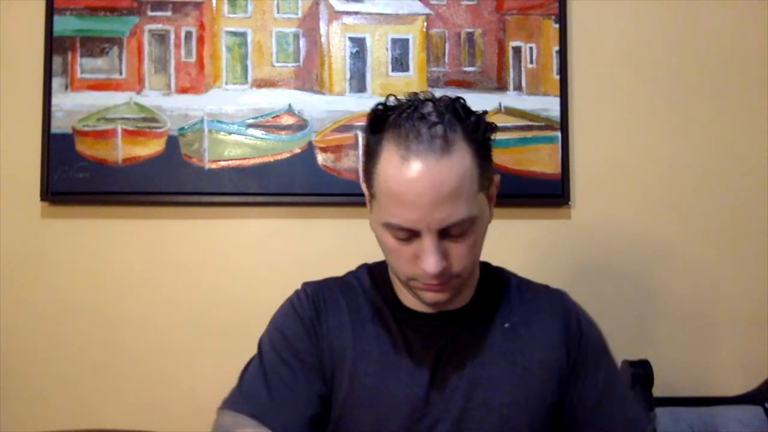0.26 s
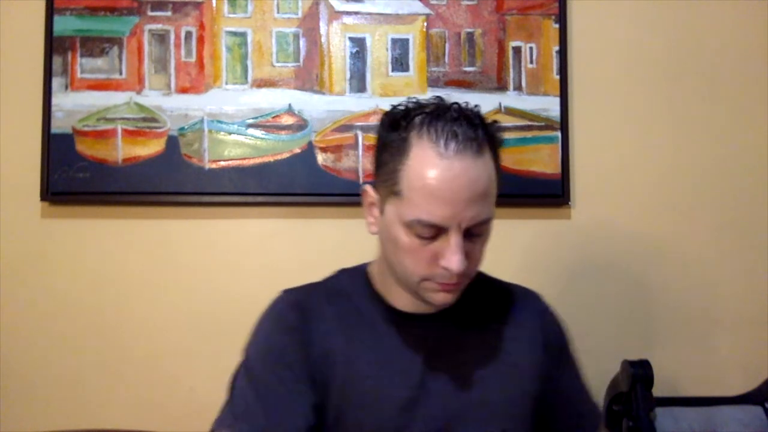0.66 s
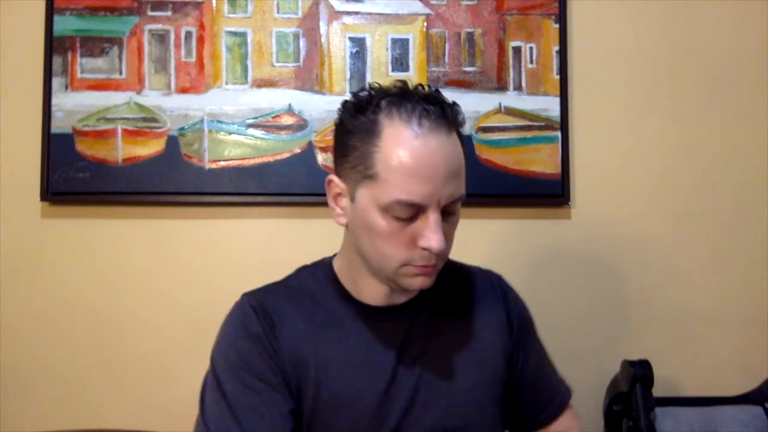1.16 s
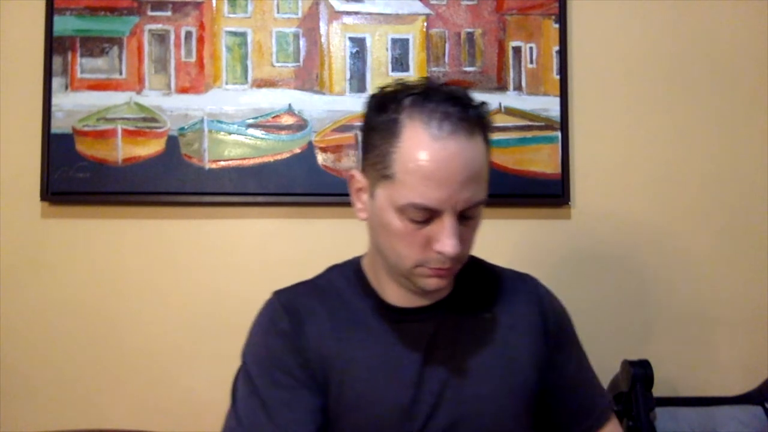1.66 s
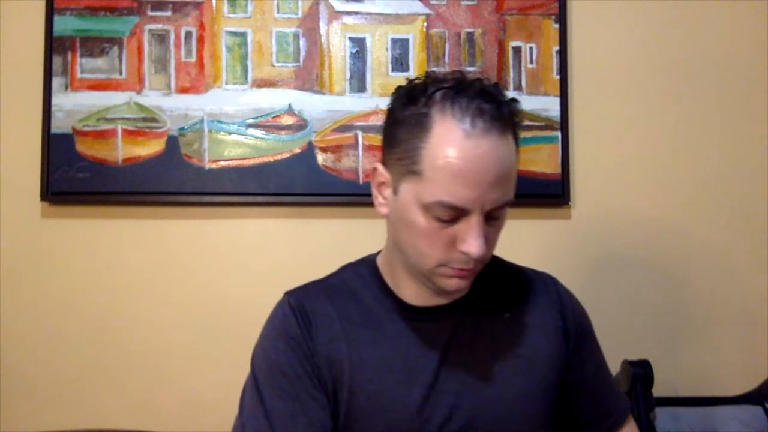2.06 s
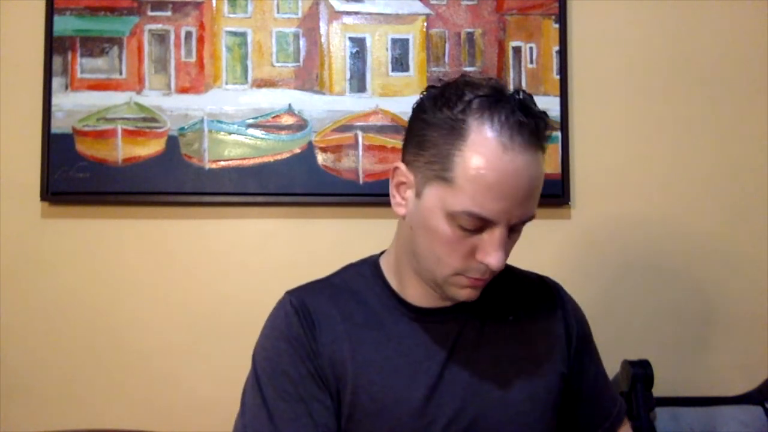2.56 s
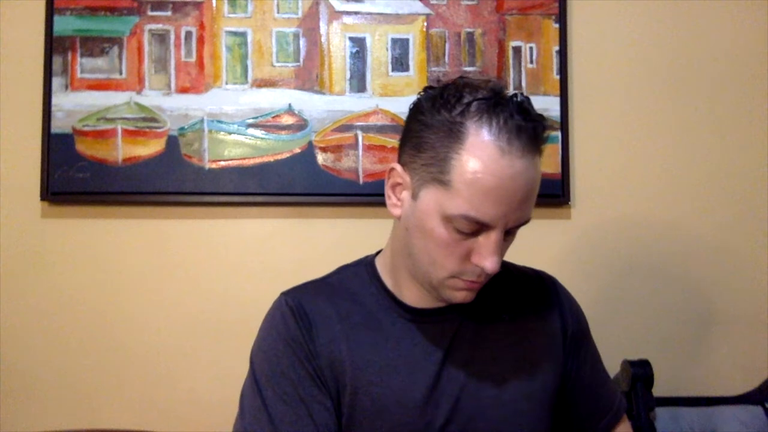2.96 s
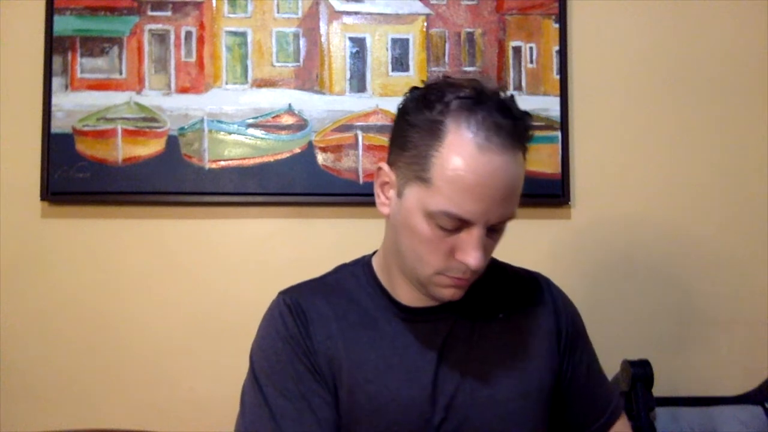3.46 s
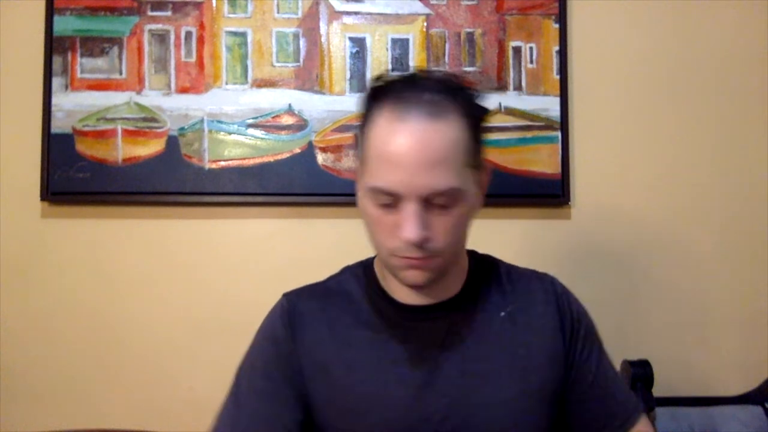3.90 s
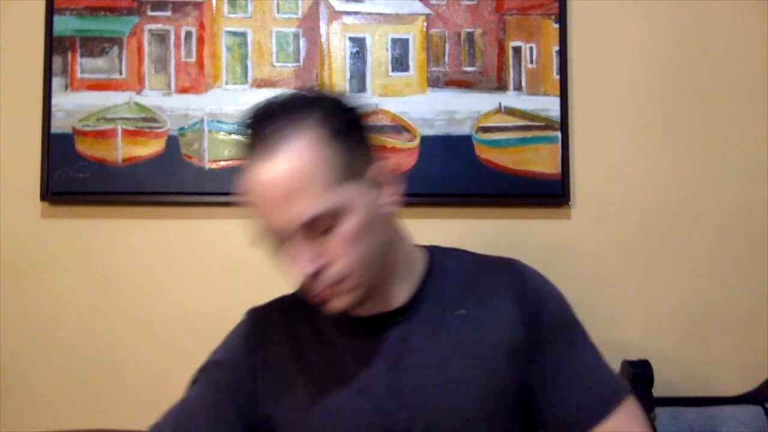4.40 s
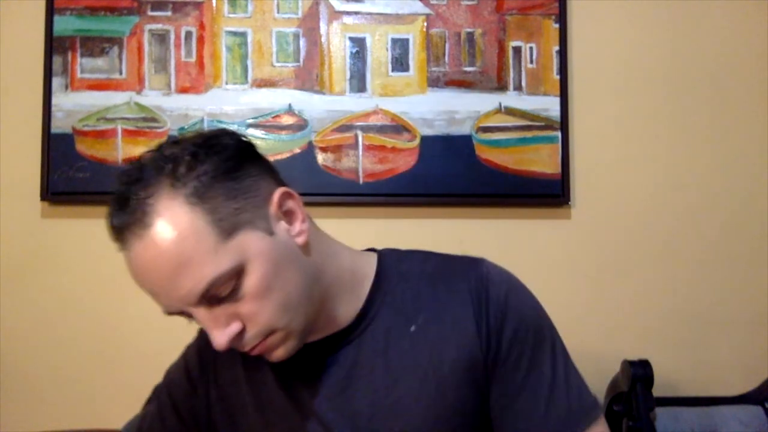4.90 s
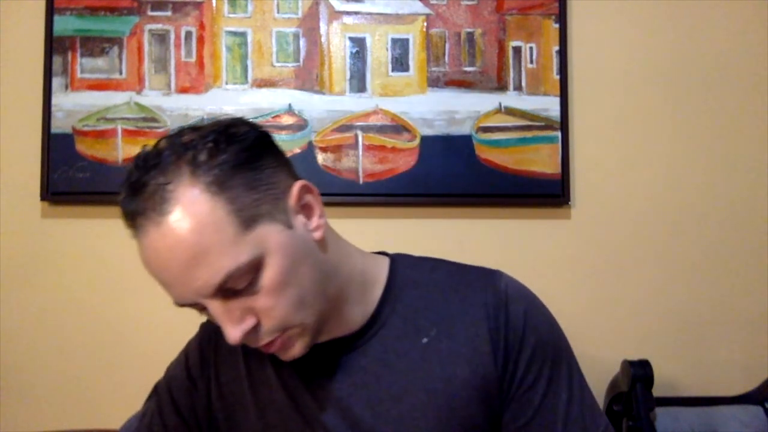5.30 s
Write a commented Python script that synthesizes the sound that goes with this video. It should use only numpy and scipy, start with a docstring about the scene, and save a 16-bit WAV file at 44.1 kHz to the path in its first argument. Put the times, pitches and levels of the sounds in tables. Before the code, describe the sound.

Sparse tape snaps and soft film rustle lead to a box knock and a brief harsh tape rip, then quiet handling and ticks.

```python
"""Packing tape snaps, rustles and rips loose from a cardboard box, over bumps, slides and a fan-like hush.
Hands work in a small quiet room near a laptop microphone.
Snaps are clicks with a noise spray into resonances; the rip is a stick-slip click train.
Blows ring the box modes; rustle, slides, crinkle and rattle are noise or random clicks under swells.
The hush is steady coloured noise with resonances, the bumps are noise through low resonances."""
import sys
import numpy as np
from scipy import signal
from scipy.io import wavfile
from scipy.ndimage import uniform_filter1d

SR = 44100
rng = np.random.default_rng(int(sys.argv[2]) if len(sys.argv) > 2 else 0)


def materialize(psi):
    """Save the field psi as 16-bit PCM at rate SR to the path in sys.argv[1].

    A 1-D psi becomes a single channel; in a 2-D psi each row is a channel.
    """
    bounded = np.clip(np.atleast_2d(psi).T, -1, 1)
    quanta = np.round(bounded * 32767).astype(np.int16)
    wavfile.write(sys.argv[1], SR, quanta)


N = 244402

# Spectrum of the hush. Each row: frequency in Hz, relative density in dB per Hz.
HUSH_SPECTRUM = [(15, -27.5), (25, -1), (111, -0.5), (242, -4), (607, -4.5), (677, 3.5), (734, -20),
                 (796, -4), (1150, -8.5), (1500, -12.5), (1840, -4), (3430, -26.5), (7310, -32),
                 (16000, -38.5)]
# Resonances in the hush. Each row: centre in Hz, width in Hz, rms level in dB.
HUSH_RESONANCES = [(471, 84, -77.5), (673, 32, -80.5), (782, 42, -76), (1014, 180, -75.5), (2000, 160, -83),
                   (2116, 110, -78.5), (2760, 380, -74)]
# Bumps carried through the table. Each row: peak time in seconds, level in dB, fall in seconds,
# hollow box tone relative to the level in dB.
TABLE_BUMPS = [(.01, -69.5, 1.1, -6.5), (.32, -62, 0.096, -6), (.56, -68, 0.7, -3.5),
               (.76, -70.5, 0.29, 11.5), (.87, -73, 0.3, 4), (1.02, -72.5, 0.46, 11), (1.12, -63, 0.95, -3),
               (1.4, -69, 0.27, -16), (1.71, -78, 0.14, -3), (1.87, -54.5, 0.39, -9.5),
               (2.11, -57, 0.16, -29), (2.28, -71.5, 0.56, -25), (2.54, -72.5, 0.53, -23),
               (2.96, -62.5, 0.71, -7.5), (3.09, -53.5, .4, -10.5), (3.27, -47.5, 0.13, -3),
               (3.34, -38, 0.059, -6.5), (3.76, -74, .25, -8), (4.0, -61, 0.44, -4),
               (4.35, -74, 1.41, -14.5), (4.76, -74, 1.0, -9)]
# Decay of the room. Each row: frequency in Hz, t60 in seconds.
ROOM_T60 = [(200, .2), (1000, .18), (4000, .2), (12000, .18)]
# Tape and sleeves rustle. Each row: peak time in seconds, level in dB, rise and fall in seconds.
RUSTLE_SWELLS = [(.06, -61.5, 0.67, 0.2), (.32, -66.5, 0.069, 0.39), (.607, -74.5, 0.055, 2),
                 (1.0, -76.5, 0.99, 0.29), (1.477, -58.5, 0.25, 0.2), (1.72, -68, .4, 0.21),
                 (1.84, -60, 0.032, 0.17), (2.157, -63.5, .45, 0.11), (2.25, -77.5, .1, .6),
                 (2.61, -69, .4, 0.15), (2.83, -79, 0.12, 0.84), (2.98, -65.5, 0.022, 0.42),
                 (3.07, -67.5, .03, 0.075), (3.14, -47, 0.036, 0.092), (3.46, -59, .15, 0.24),
                 (3.785, -74.5, .4, 0.092), (4.0, -55.5, 0.052, 0.1), (4.196, -55, .15, 0.12),
                 (4.474, -72.5, .1, 0.53), (4.78, -76.5, .2, 0.66), (5.01, -76, .1, 0.2),
                 (5.33, -73.5, .1, 1.3)]
# Spectrum of the rustle. Each row: frequency in Hz, relative density in dB per Hz.
RUSTLE_SPECTRUM = [(2200, -25), (3500, -3), (4700, -2), (6100, 0), (9000, -3), (12500, -8), (16000, -14)]
# Loose film crinkles in the fingers. Each row: peak time in seconds, level in dB, rise and fall in seconds.
CRINKLE_SWELLS = [(.08, -54, 1.3, 0.095), (1.391, -61.5, 0.12, 0.092), (4.801, -70, 0.82, 0.24),
                  (5.42, -76.5, 0.36, 0.35)]
# A hand slides over the cardboard. Each row: peak time in seconds, level in dB, rise and fall in seconds.
SLIDE_SWELLS = [(3.962, -60, 0.0055, 0.29), (4.03, -50.5, 0.063, 0.074), (4.19, -57, 0.082, 0.092)]
# Spectrum of the slides. Each row: frequency in Hz, relative density in dB per Hz.
SLIDE_SPECTRUM = [(240, -37.5), (400, -18), (979, -18.5), (1140, -17.5), (2670, -9), (4240, -13),
                  (4800, -28), (13300, -28.5), (16000, -27)]
# The flaps rattle around the hardest blows. Each row: peak time in seconds, level in dB,
# rise and fall in seconds.
RATTLE_SWELLS = [(3.102, -40.5, 0.0033, 0.042), (3.148, -40, 0.05, 0.04)]
# Modes of the box. Each row: frequency in Hz, level in dB, t60 in seconds.
BOX_MODES = [(70.5, -14.5, 0.13), (125.5, -9, 0.25), (145, -2.5, 0.17), (196.9, -1.5, 0.072),
             (266, 4, 0.075), (319.6, -4.5, 0.06), (424, -17.5, 0.042)]
# Blows on the box. Each row: time in seconds, strength in dB, contact time in seconds.
BOX_BLOWS = [(0.555, -51.5, 0.0061), (1.866, -45.5, 0.0068), (3.103, -35, 0.0024), (3.107, -26.5, 0.0024),
             (3.131, -25, .006), (3.149, -34.5, .003), (3.257, -34.5, 0.0052), (3.957, -52, 0.0045)]
# Glue and film let go. Each row: time in seconds, film peak in dB, film ring in Hz, then flap ring,
# dull part and bright part relative to the film in dB, creak before and spray after in seconds.
TAPE_SNAPS = [(.081, -32.5, 3560, -17, -39, 4.5, 0.00008, 0.00055),
              (0.1857, -43.5, 3100, -33, -28, -19, 0.00022, 0.0022),
              (0.2343, -41, 5800, -15, -30, -18, 0.00011, 0.0012),
              (0.2737, -27.5, 5300, -44, -16.5, -25, 0.000097, 0.0018),
              (0.5904, -41, 6270, -20, -17, -18, 0.000086, 0.00036),
              (0.605, -42.5, 3170, -10, 0.5, 0, 0.000091, 0.00016),
              (.758, -46.5, 7500, -17, -19, -20, .0002, 0.0011),
              (.779, -51, 5500, -22, -23, -25, .0002, .001),
              (.856, -49.5, 5900, -25, -26, -19, 0.00025, 0.00081),
              (1.053, -49, 5750, -31, -28, -23, .0001, 0.0018),
              (1.165, -46.5, 8500, -11, 2.5, 2, 0.000084, 0.00082),
              (1.287, -46, 8600, -19, -32, -1, .0002, 0.00081),
              (1.36, -51, 7500, -24, -30, -20, .0002, .001),
              (1.3708, -39, 6860, -40, -42, -23, 0.00007, 0.0017),
              (1.8193, -24.5, 2730, -11, 4.5, 0, 0.00013, 0.00022),
              (1.944, -47, 6560, -11, -28, -29, 0.00011, 0.0017),
              (1.987, -40.5, 3670, -25, -4.5, 1, 0.0025, 0.0022),
              (2.152, -40.5, 7600, -5, -11, -32, 0.0027, 0.0012),
              (2.23, -34.5, 3070, -18, -1.5, -9, 0.0013, 0.0011),
              (2.4878, -28.5, 1830, -35, -25, -35, 0.0018, 0.00016),
              (2.4927, -36.5, 3430, -9, -7, -4, 0.0016, 0.00057),
              (2.81, -45, 8600, -34, -31, -14, 0.00033, 0.0011),
              (2.9659, -26.5, 6100, -22, -12, -28, 0.0013, 0.0025),
              (3.068, -44.5, 6440, -21, -1.5, -12.5, 0.0013, 0.006),
              (3.105, -31.5, 7770, -22, -25, -1, 0.00084, .0025),
              (3.1151, -24, 6700, -28, -5.5, -22, 0.0011, 0.0016),
              (3.126, -17, 6970, -31, -14, -32, .0013, 0.0015),
              (3.136, -21, 6940, -39, -8, -34, 0.0018, 0.0014),
              (3.2835, -10, 5900, -17, -19, -1.5, 0.000082, 0.0045),
              (3.298, 0.5, 5120, -31, -23.5, 4.5, 0.0002, 0.00033),
              (4.4535, -44.5, 7620, -29.5, -29, -8, 0.000089, 0.00064),
              (4.4742, -44, 4100, -23, -23.5, -23, .0001, .0008),
              (4.699, -45, 3770, -24, -20, -14, 0.01, 0.0015),
              (4.717, -48, 7000, -25, -28, -6, .0001, .0005),
              (4.756, -26.5, 3230, -36, -16.5, -4.5, 0.0011, 0.0022),
              (4.778, -40, 9470, -31, -28, -15.5, 0.00011, 0.00042),
              (4.799, -45, 6550, -28, -28, -15, 0.00012, 0.00038),
              (4.829, -31, 4030, -40, -20, -23, 0.0019, 0.00071),
              (4.9923, -41.5, 3000, -16, -24, -21.5, 0.0003, 0.0038),
              (4.9973, -33.5, 2470, 0, -8.5, -2, 0.00052, 0.0002),
              (5.2242, -47, 3700, -15.5, -21.5, -12, 0.0001, 0.0016),
              (5.31, -42, 4300, -9.5, -23, -9, 0.00011, 0.00098),
              (5.346, -52, 1800, -17, -17, -30, .0005, 0.00098),
              (5.395, -45.5, 3200, -26.5, -26.5, -15.5, .0001, .0007),
              (5.421, -44, 2404, -5.5, -8, -18, 0.00013, 0.00064),
              (5.431, -43.5, 5000, -17, -19, -2, .0001, 0.001),
              (5.489, -48, 3290, -28, -20, 6.5, 0.00014, 0.00042)]
# The rip, a first tug and then the pull. Each row: time in seconds, level in dB, sharpness 0-1,
# gain of the cardboard's body band in dB.
RIP_CURVE = [(3.248, -25, 0.38, -6.5), (3.262, -23.5, 0.3, -7.5), (3.281, -34, 0.22, -6.5),
             (3.284, -24, 0.7, -7.5), (3.3, -13, 0.86, -4), (3.325, -11, 0.85, -2.5), (3.343, -17, 0.88, 1),
             (3.356, -26, 0.72, -2), (3.375, -38, 0.13, -2.5)]
# Spectrum of the rip. Each row: frequency in Hz, relative density in dB per Hz.
RIP_SPECTRUM = [(180, -56.5), (300, -27), (603, -24.5), (900, -14.5), (978, -13), (1430, -8), (2740, -11),
                (3760, -5.5), (4230, -4), (7200, -0.5), (10700, -8.5), (16000, -18)]

HUSH_DB, TABLE_FLOOR_DB = -70.0, -83.5
SWELL_DB = 20  # climb over a swell's rise time, drop over its fall time
BUMP_RISE_S = 0.031
ROOM_DB, SNAP_ROOM_DB = -10, -12.5  # snaps reach the walls less than the rip
FIRST_WALL_S = .0092
BOX_LOW_HZ = 80  # the small box radiates little below this
SNAP_LEAD_SAMPLES, SNAP_SAMPLES = 400, 1200  # lead: part of a snap before its click
SPRAY_SHARE = 0.21  # noise around a snap's click, relative to the click
TUG_SLIPS_PER_S, PULL_SLIPS_PER_S = 210, 480
PULL_S, SPEED_UP_S = 3.275, .025
SECOND_CLICK_S, SLIP_SPRAY_S = 0.0011, 0.0017
OVERLOAD_LEVEL, EDGE_HZ = .9, 15900


def gain_of(db):
    """Decibels to amplitude."""
    return 10 ** (np.asarray(db) / 20)


def evened(x):
    """Scales to rms 1."""
    return x / np.sqrt(np.mean(x ** 2) + 1e-20)


def read(points, hz):
    """Interpolates a frequency table on a log-frequency axis."""
    f, value = np.transpose(points)
    return np.interp(np.log(hz + 1), np.log(f + 1), value)


def add(mix, s, sound):
    """Mixes a sound in at time s."""
    part = mix[round(s * SR):][:len(sound)]
    part += sound[:len(part)]


def colour(x, points):
    """Minimum-phase filter with the given spectrum, energy 1."""
    hz = abs(np.fft.fftfreq(4096, 1 / SR))
    log_gain = np.log(gain_of(np.maximum(read(points, hz), -100)))
    response = np.exp(np.conj(signal.hilbert(log_gain)))
    taps = np.fft.ifft(response).real[:2048]
    return signal.oaconvolve(x, taps / np.linalg.norm(taps))[:len(x)]


def band(x, hz, width):
    """Two-pole resonance of peak gain 1."""
    b, a = signal.iirpeak(min(hz, .45 * SR), hz / width, SR)
    return signal.lfilter(b, a, x)


def crackle(n, per_s, spread_db):
    """Clicks at random times, exponentially spread in dB, scaled to rms 1."""
    size = gain_of(spread_db * np.minimum(rng.exponential(1, n), 4))
    signed = size * rng.choice([-1., 1.], n)
    return evened(signed * (rng.random(n) < per_s / SR))


def swells(peak, level_db, rise, fall):
    """Level of overlapping movements, each climbing to its peak and dying away; powers add."""
    step = 32  # samples between computed levels
    after = np.arange(N // step + 2)[:, None] * step / SR - peak
    slope = np.where(after < 0, -after / np.maximum(rise, .002), after / np.maximum(fall, .002))
    level = np.sqrt((gain_of(level_db - SWELL_DB * slope) ** 2).sum(1))
    return np.interp(np.arange(N) / step, np.arange(len(level)), level)


def played(rows, make):
    """Runs make(times, *columns) over the span of a curve and sets its level."""
    s, level_db, *columns = np.transpose(rows)
    t = np.arange(s[0], s[-1], 1 / SR)
    edge_s = np.minimum(t - s[0], s[-1] - t)
    fade = np.clip(edge_s / .002 + 1e-3, 0, 1)
    level = gain_of(np.interp(t, s, level_db))
    sound = make(t, *(np.interp(t, s, c) for c in columns))
    return s[0], fade * level * sound


def hush():
    """Steady air noise with a few duct resonances."""
    tones = np.zeros(N)
    for hz, width, db in HUSH_RESONANCES:
        tones += gain_of(db) * evened(band(rng.standard_normal(N), hz, width))
    return gain_of(HUSH_DB) * colour(rng.standard_normal(N), HUSH_SPECTRUM) + tones


def handling():
    """Bumps as low lumpy rumble, with noise through the box modes humming on top."""
    peak, level_db, fall, box_db = np.transpose(TABLE_BUMPS)
    low = band(band(band(rng.standard_normal(N), 45, 91), 33, 85), 32, 120)
    hollow = signal.oaconvolve(rng.standard_normal(N), blow(0, contact=.004))[:N]
    low_level = swells(peak, level_db, BUMP_RISE_S, fall) + gain_of(TABLE_FLOOR_DB)
    hollow_level = swells(peak, level_db + box_db, BUMP_RISE_S, fall)
    return low_level * evened(low) + hollow_level * evened(hollow)


def room(x):
    """Sparse reflections from the first wall on, each band dying at its own speed."""
    slot = 20  # samples, one reflection in each
    taps = np.zeros(SR // 2)
    slots = len(taps) // slot
    at = np.arange(round(FIRST_WALL_S * SR), len(taps) - slot, slot)
    at = at + rng.integers(0, slot, slots)[:len(at)]
    taps[at] = rng.choice([-1., 1.], slots)[:len(at)]
    hz, t, z = signal.stft(taps, SR, nperseg=256)
    decay = gain_of(-60 * t / read(ROOM_T60, hz)[:, None])
    tail = signal.istft(z * decay, SR, nperseg=256)[1]
    return signal.fftconvolve(x, tail / np.linalg.norm(tail))[:N]


def rustle(n):
    """Fine hiss of film and cloth with tiny ticks in it."""
    ticks = crackle(n, per_s=110., spread_db=4.)
    return colour(rng.standard_normal(n) + gain_of(-5.0) * ticks, RUSTLE_SPECTRUM)


def crinkle(n):
    """Loose film buckles in separate bright ticks."""
    return evened(band(crackle(n, per_s=240., spread_db=3.), 6500, 9000))


def slide(n):
    """Skin on cardboard: friction noise with dense grains."""
    hiss = rng.standard_normal(n)
    grains = crackle(n, per_s=1600.0, spread_db=-6.0)
    return colour(1.12 * hiss + 0.5 * grains, SLIDE_SPECTRUM)


def rattle(n):
    """Dense knocks into the ring of the flaps."""
    knocks = crackle(n, per_s=920.0, spread_db=3.5)
    ring = band(knocks, 1070, 140)
    return evened(ring + 0.2 * band(knocks, 700, 500) + 0.39 * band(knocks, 2400, 2800))


def blow(db, contact):
    """A smooth raised-cosine push rings the panels and the air of the box."""
    t = np.arange(round(.3 * SR)) / SR
    rings = sum(gain_of(m - 60 * t / t60) * np.sin(2 * np.pi * hz * t) for hz, m, t60 in BOX_MODES)
    push = np.hanning(max(round(contact * SR), 3))
    b, a = signal.butter(N=2, Wn=BOX_LOW_HZ, btype="high", fs=SR)
    return gain_of(db) * signal.lfilter(b, a, signal.oaconvolve(rings, push / push.sum()))


def snap(peak_db, hz, flap_db, dull_db, bright_db, creak, spray, noise):
    """The glue creaks, lets go in a click and sprays noise; film, flap and cardboard ring with it."""
    t = (np.arange(len(noise)) - SNAP_LEAD_SAMPLES) / SR
    fading_s = np.maximum(np.where(t < 0, creak, spray), 5e-5)
    drive = SPRAY_SHARE * noise * np.exp(-abs(t) / fading_s)
    drive[SNAP_LEAD_SAMPLES] += 1
    film = band(band(drive, hz, 1.3 * hz), hz, 1.3 * hz)
    flap = band(band(drive, 2290, 300), 2800, 1500)
    dull = band(drive, 430, 350) + 0.67 * band(drive, 1300, 600)
    bright = band(band(drive, 8900, 7200), 11000, 9000)
    parts = ((film, 0), (flap, flap_db), (dull, dull_db), (bright, bright_db))
    return gain_of(peak_db) * sum(gain_of(db) * p / abs(p).max() for p, db in parts)


def rip(t, sharp, body_db):
    """Stick and slip: the glue lets go in uneven jerks, each a click with a second one and a spray behind."""
    n = len(t)
    per_s = np.interp(t, [PULL_S, PULL_S + SPEED_UP_S], [TUG_SLIPS_PER_S, PULL_SLIPS_PER_S])
    wander = evened(uniform_filter1d(rng.standard_normal(n), size=150))
    turns = .55 + np.cumsum(per_s * np.exp(0.25 * sharp * wander)) / SR
    # one slip per whole turn
    slips = np.diff(np.floor(turns), prepend=0) * gain_of(-2.0 + 1.8 * rng.standard_normal(n))
    second = np.roll(slips, round(SECOND_CLICK_S * SR))
    slips = slips + 0.33 * second * np.clip(300 / per_s, 0, 1)  # weaker when slips crowd
    fading = np.exp(-np.arange(300) / SR / SLIP_SPRAY_S)
    spray_level = signal.lfilter(fading / np.linalg.norm(fading), 1, abs(slips))
    spray = spray_level * rng.standard_normal(n)
    sharp = np.clip(sharp, 0, 1)
    drive = sharp * slips + np.sqrt(1 - sharp ** 2) * spray
    film = colour(drive * np.sqrt(SR / per_s), RIP_SPECTRUM)  # evens the level over slip rates
    return film + (gain_of(body_db) - 1) * band(film, 1500, 2500)


def scene():
    """Sharp sounds get the room; rustle, slides, rattle, rumble and hush are already diffuse."""
    near = swells(*np.transpose(CRINKLE_SWELLS)) * crinkle(N)
    diffuse = hush() + handling()
    for table, make in ((RUSTLE_SWELLS, rustle), (SLIDE_SWELLS, slide), (RATTLE_SWELLS, rattle)):
        diffuse += swells(*np.transpose(table)) * make(N)
    for s, db, contact in BOX_BLOWS:
        add(near, s, blow(db, contact))
    add(near, *played(RIP_CURVE, rip))
    snaps = np.zeros(N)
    for s, *row in TAPE_SNAPS:
        noise = rng.standard_normal(SNAP_SAMPLES)
        add(snaps, s - SNAP_LEAD_SAMPLES / SR, snap(*row, noise))
    reflected = room(gain_of(ROOM_DB) * near + gain_of(SNAP_ROOM_DB) * snaps)
    return (near + snaps + reflected + diffuse)[None]


def record(dry):
    """Soft overload, strongest on the loudest slips, then the band limit of the recorder."""
    soft = OVERLOAD_LEVEL * np.tanh(dry / OVERLOAD_LEVEL)
    low_pass = signal.firwin(511, EDGE_HZ, window=("kaiser", 9), fs=SR)
    return signal.oaconvolve(soft, low_pass[None], "same")


dry = scene()
out = record(dry)
materialize(out)
```